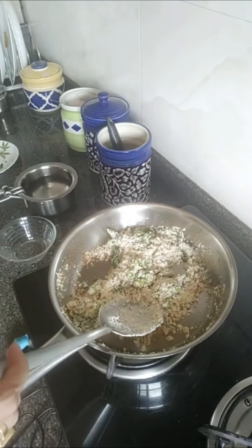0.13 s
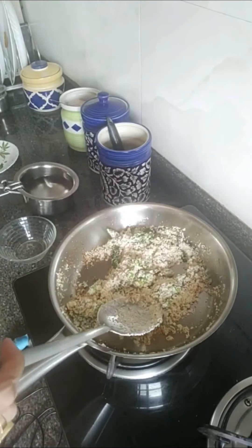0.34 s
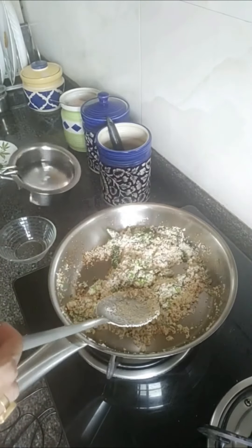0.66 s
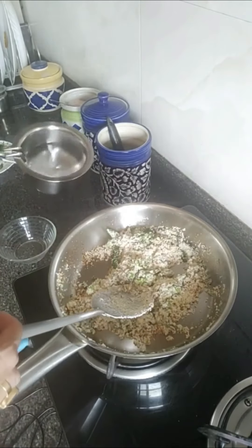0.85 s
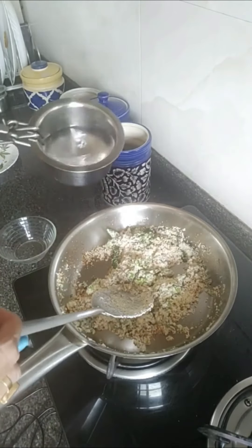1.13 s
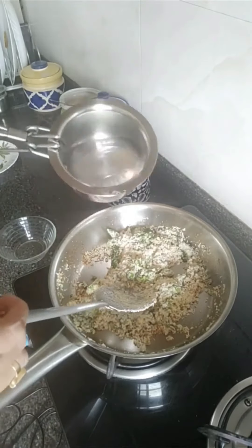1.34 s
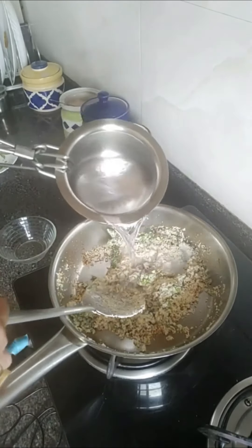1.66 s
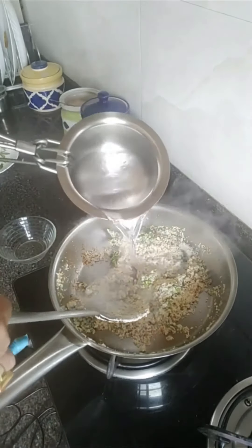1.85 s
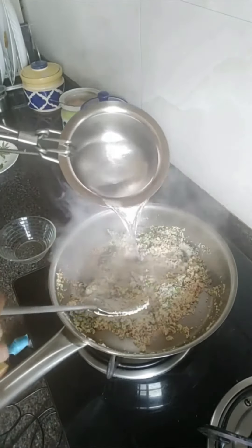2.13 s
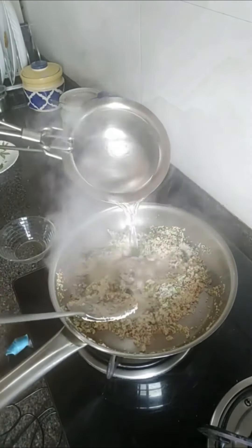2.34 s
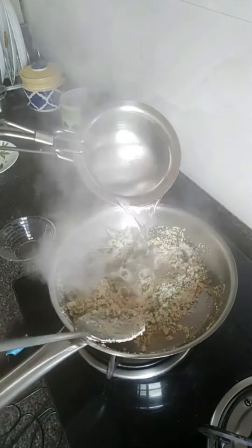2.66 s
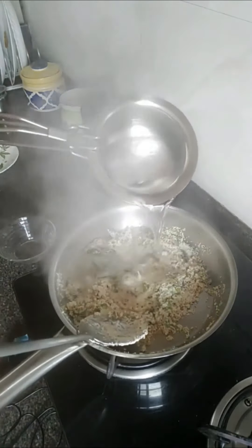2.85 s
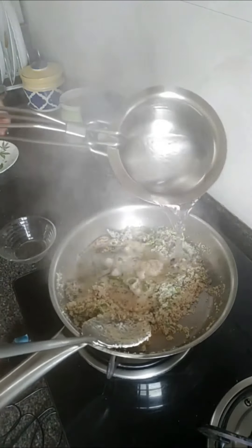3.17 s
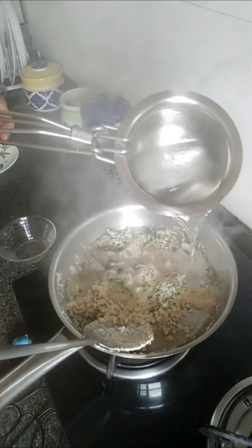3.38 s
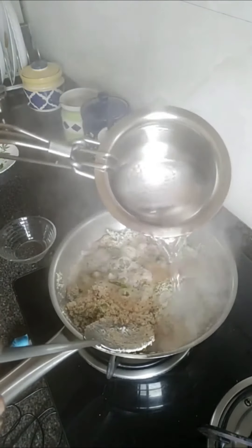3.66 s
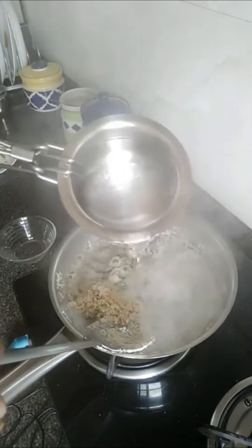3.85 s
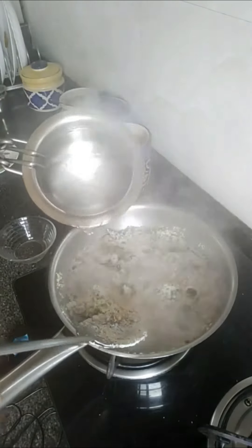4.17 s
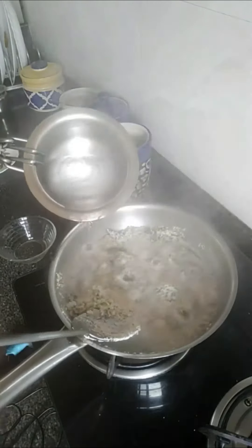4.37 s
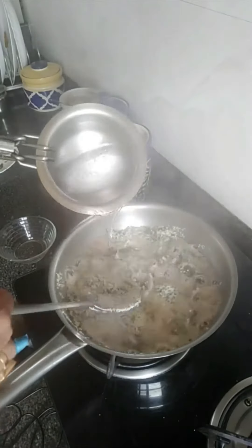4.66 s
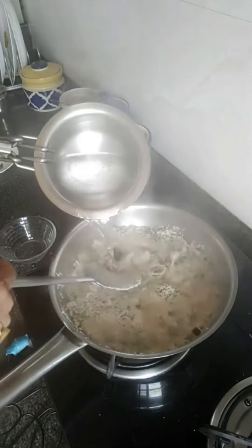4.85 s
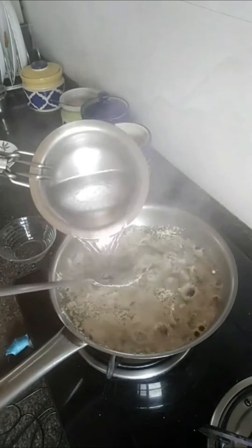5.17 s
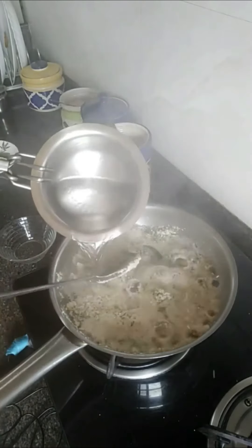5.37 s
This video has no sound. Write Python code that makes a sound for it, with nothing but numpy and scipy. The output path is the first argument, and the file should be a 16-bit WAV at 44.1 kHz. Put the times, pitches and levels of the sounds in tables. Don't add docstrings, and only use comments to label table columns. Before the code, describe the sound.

Metal utensils clink, grain crackles in a hot pan, then poured water bursts into a loud, dense steam hiss that slowly turns to bubbling sizzle.

```python
import sys
import numpy as np
from scipy import signal
from scipy.fft import rfft, irfft, next_fast_len
from scipy.io import wavfile
from scipy.ndimage import uniform_filter1d, minimum_filter1d

SR = 44100
rng = np.random.default_rng(int(sys.argv[2]) if len(sys.argv) > 2 else 0)


def persist_wave(psi):
    counts = np.round(np.clip(psi, -1, 1) * 32767).astype(np.int16)
    wavfile.write(sys.argv[1], SR, np.atleast_2d(counts).T)


def volts(x):
    e = np.asarray(x, float) / 20
    return 10 ** e


N = 242991
FREQ_HZ = np.fft.rfftfreq(next_fast_len(N), 1 / SR) + 1e-3
TIME_S = np.arange(N) / SR

# (frequency [Hz], density [dB/Hz])
BURNER = [(15, -41), (25, -14), (54, -40), (98, -4.5), (131, -11.5), (159, -4.5), (238, -6), (393, -2.5),
          (441, -5), (567, -4), (649, -8), (802, -7.5), (2500, -23.5), (3250, -61), (5500, -120)]
# (frequency [Hz], width [Hz], level [dB])
FAN = [(87.5, 12, -60.5), (111.4, 9.8, -57), (162.6, 2.3, -57), (270, 9.9, -68), (324, 11, -74)]
BURNER_DB = -44.5

# (time [s], level [dB])
DRY_FIZZ = [(.1, -46.5), (.4, -48.5), (.6, -50.5), (.65, -49.5), (.7, -49), (.8, -49), (.9, -50),
            (1.2, -50.5), (1.5, -50.5)]
# (frequency [Hz], density [dB/Hz])
DRY_COLOUR = [(1060, -3), (1800, -14), (2120, -10.5), (2720, -1), (3980, -5), (7750, -3.5), (8710, -4),
              (12500, -7), (15500, -15)]
# (time [s], peak [dB], pitch [Hz])
TICKS = [(0.1984, -45, 9470), (0.3544, -28, 2940), (0.4944, -33, 5320), (0.5104, -35, 6890),
         (0.5294, -35, 5410), (0.5786, -34, 9630), (0.7063, -33, 6650), (0.7502, -31, 8480),
         (0.7694, -30, 9480), (0.7994, -30, 8660), (0.8774, -29, 8540), (1.0834, -32, 8790),
         (1.1994, -40, 2700)]
# (start [s], end [s], pitch [Hz], level [dB])
SQUEAKS = [
    (0.38, 0.54, 5990, -51.5),
    (.41, .495, 12850, -55),
]
RUSTLE_S, RUSTLE_LENGTH_S, RUSTLE_HZ, RUSTLE_DB = 0.79, 0.07, 9500, 4.5

# (frequency [Hz], level [dB], t60 [s])
LADLE = [(1145, -29.5, 0.3), (2590, -13, 0.12), (3160, -9, 0.12), (3300, -20, .25), (3760, -15, 0.2),
         (3850, -25, 0.27), (4750, -17.5, 0.23), (5100, -21, .2), (5300, -6, 0.097), (5980, -15.5, 0.29),
         (6150, 2, 0.071), (6260, -12, 0.21), (6430, -17, 0.18), (6400, -17, 0.21), (7372, -28, 0.21),
         (7530, -17, .12), (8000, -20, 0.22), (7989, -15, 0.13), (8200, -21, 0.22), (8600, -12, 0.2),
         (8900, -17, 0.15), (9086, -9, 0.21), (9440, -22, .2), (9750, -6, 0.1), (10700, -21, .25),
         (10900, -20, .15), (11400, -20, 0.18), (11650, -18, .17), (13000, -24, .13), (14450, -25, .12)]
TONGS = [(266, -20, 0.12), (510, -9, 0.13), (713, -20.5, 0.2), (2560, -25, .12), (2944, -11, .26),
         (2956, -11, .31), (3350, -26, .2), (3564, -16, 0.16), (3690, -6.5, 0.12), (3800, -7, .1),
         (4000, -26, .25), (4480, -24, .2), (4770, -19, 0.19), (4930, -13, .17), (4910, -22, .45),
         (5000, -22, 0.39), (5200, -14, 0.18), (5370, -15, .15), (6015, -7, 0.09), (6090, -21, .35),
         (6250, -17, .35), (6600, -21, .16), (7115, -19, 0.17), (7360, -21, .17), (7640, -14, .17),
         (7370, -11, 0.12), (8100, -16, .15), (9700, -14, .13), (11200, -15, 0.12), (11700, -16, .15)]
BOWL = [(680, -3, 0.16), (1060, -1, 0.15), (1650, -2, 0.12)]
# (time [s], strength [dB], crash above strength [dB], crash t60 [s])
LADLE_BLOWS = [
    (.0005, -17.5, -3, 0.11),
    (0.021, -38, -5, 0.12),
    (0.081, -35.5, 2, 0.14),
]
TONG_BLOWS = [
    (.226, -44, 7, 0.12),
    (0.233, -27, 0.5, 0.11),
    (.245, -27, -0.5, 0.18),
    (.264, -32, -3, 0.099),
]
BOWL_BLOWS = [
    (.662, -50.5, 5, .14),
    (1.175, -52, 6, 0.15),
]
# (frequency [Hz], density [dB/Hz])
LADLE_CRASH = [(300, -18), (2000, -19), (2800, -11), (6000, -1), (10000, -7), (15500, -12)]
TONG_CRASH = [(150, -20), (550, -5), (1400, -10), (2100, -23), (3000, -4), (7000, 3.5), (12000, -11),
              (15500, -18)]
BOWL_CRASH = [(400, -6), (1100, 0), (2700, -6), (5000, -16)]

# (frequency [Hz], density [dB/Hz])
STEAM = [(330, -46), (540, -22.5), (900, -13), (1250, -13.5), (2150, -12), (2950, -4), (4700, -5),
         (6500, -1), (8000, 0), (9400, -2.5), (11500, -4), (13000, -9), (15300, -11), (15600, -12)]
# (frequency [Hz], width [Hz], level [dB])
PAN = [(460, 11, -8.5), (562.6, 10, -1), (576, 8.3, -3.5), (634, 9.4, -3.5), (696, 5.2, -6), (744, 12, -9),
       (801, 25, 3.5), (825, 20, -1), (861, 24, 0.5), (910, 20, -16), (973, 3.7, -2), (1012, 21, -3.5),
       (1062, 10, 2.5), (1104, 21, -1), (1110, 24, -14), (1197, 16, -24), (1333, 40, -10), (1483, 23, -8),
       (1528, 20, -1.5), (1670, 43, 1), (1796, 30, -3), (2140, 30, -25), (2330, 20, -5), (2466, 20, -0.5)]
# (frequency [Hz], gain [dB])
SPOT = [(300, -0.5), (2900, -1.5), (3700, 0.5), (4600, -1.5), (5500, -1), (6400, -1), (8400, 0.5),
        (9400, -2.5), (10300, 2.5), (11500, -2), (12500, -2), (13600, 2), (14600, -0.5), (15600, -4)]
# (time [s], steam hiss [dB], share of hot base under water [0-1])
FLOW = [(1.55, -15, 0.32), (1.66, -13.5, 0.22), (1.92, -12, 0.09), (2.18, -14.5, 0.47), (2.44, -14, .5),
        (2.7, -14, 0.57), (2.96, -14.5, 0.47), (3.09, -11.5, 0.33), (3.48, -14.2, 0.18), (3.87, -14, 0.36),
        (4.14, -15.5, 0.65), (4.41, -16, 0.77), (4.55, -18, 0.68), (4.68, -16.5, 0.64), (4.86, -17, 0.7),
        (5.04, -18, 0.73), (5.22, -19.5, 0.84), (5.5, -18.5, 0.67)]
# (time [s], gain [dB], length [s])
SURGES = [
    (1.584, 1.7, 0.063),
    (4.454, 1.5, 0.014),
    (5.416, 2.5, 0.022),
]
SPREAD_S = (1.9, 3.3)
FIRST_DROP_S, STREAM_S, DROPS_DB, DROPS_DB_PER_S, STREAM_DB_PER_S = 1.503, 1.549, -13, 1600, 560
FIRST_TILT = 0.11
# (bare base [dB], under water [dB])
FINE_DB, COARSE_DB, BOIL_DB = (-5.5, -7.5), (-10, -4.5), (-21.5, -13.5)
DRIFT_DB, DRIFT_PER_S = (0.77, 0.5, 0.37), 7
POOL_DB, POOL_S = -11, 0.21

ROOM_T60_S, ROOM_DB, PAN_ROOM_DB = 0.3, -9, -13.5
CEILING, TOP_HZ = 0.8, 15600
REFILL_FROM_S, REFILL_PER_S, REFILL_HZ, REFILL_WIDTH = 1.42, 6, (4600, 15000), 0.14
REFILL_REPEAT, REFILL_MORE, REFILL_OFFSET = 0.3, 0.4, 179


def unit(x):
    return x / np.sqrt(np.mean(x ** 2))


def shape(x, gain):
    return irfft(rfft(x, next_fast_len(N)) * gain, next_fast_len(N))[:N]


def colour(points):
    hz, db = np.transpose(points)
    return volts(np.interp(np.log(FREQ_HZ), np.log(hz), db, left=-90, right=-90))


def band_rms(points, lo_hz, hi_hz):
    inside = (FREQ_HZ > lo_hz) * (FREQ_HZ < hi_hz)
    return np.sqrt(np.mean(colour(points) ** 2 * inside))


def resonances(modes):
    power = 0
    for hz, width_hz, db in modes:
        power = power + volts(db) ** 2 / width_hz / (1 + (2 * (FREQ_HZ - hz) / width_hz) ** 2)
    return np.sqrt(power)


def walk(rate_hz):
    hold = int(SR / rate_hz)
    steps = np.repeat(rng.standard_normal(N // hold + 1), hold)
    return unit(uniform_filter1d(uniform_filter1d(steps, hold), hold)[:N])


def droplets(per_s, spread_db, smooth):
    size_luck, sign_luck, when = rng.random((int(4000 * N / SR), 3)).T
    size = volts(np.minimum(-spread_db * np.log(size_luck + 1e-9), 20)) * (2 * sign_luck - 1)
    used = int(min(per_s, 4000) * N / SR)
    pops = np.bincount((when[:used] * N).astype(int), size[:used], N)
    blur = rng.standard_normal(N) * smooth
    return (unit(pops) + blur) / np.hypot(1, smooth)


def sizzle(points, lowest_octave, band_db, per_s, spread_db, smooth, shared_db, own_db, quick_db):
    spectrum = 0
    sputter_db = shared_db * walk(14) + quick_db * walk(45)
    for octave in np.arange(lowest_octave, 14.1, 1 / 3):
        band = np.cos(np.pi / 2 * np.clip(3 * (np.log2(FREQ_HZ) - octave), -1, 1))
        flicker_db = sputter_db + own_db * walk(9) + quick_db * walk(60)
        burst = droplets(per_s, spread_db, smooth) * volts(flicker_db + band_db(2 ** octave))
        spectrum = spectrum + rfft(burst, next_fast_len(N)) * band
    return irfft(spectrum * colour(points), next_fast_len(N))[:N]


def stove():
    roar = unit(shape(rng.standard_normal(N), colour(BURNER))) * volts(BURNER_DB - 1.5 + 0.19 * walk(4.8))
    drone = unit(shape(rng.standard_normal(N), resonances(FAN)))
    both = roar + drone * np.sqrt(sum(volts(db) ** 2 for _, _, db in FAN))
    return both + shape(both, FREQ_HZ < 95) * np.interp(TIME_S, [0.3, 5.3], [0.3, -0.3])


def grain_fizz():
    fizz_db = np.interp(TIME_S, *np.transpose(DRY_FIZZ))
    rustle_db = RUSTLE_DB * np.exp(-((TIME_S - RUSTLE_S) / RUSTLE_LENGTH_S) ** 2)

    def band_db(hz):
        return fizz_db + rustle_db * np.exp(-np.log2(hz / RUSTLE_HZ) ** 2 / 0.3)

    fizz = sizzle(DRY_COLOUR, 32 / 3, band_db, per_s=470, spread_db=5.0, smooth=3.5,
                  shared_db=1.1, own_db=0.7, quick_db=0.74)
    return fizz / band_rms(DRY_COLOUR, 2500, 15000)


def grain_ticks():
    out, t = np.zeros(N), TIME_S[:SR // 50]
    for s, db, hz in TICKS:
        snap = rng.standard_normal(len(t)) * volts(-60 * t / 0.0069)
        snap = snap + 0.31 * np.sin(2 * np.pi * hz * t) * volts(-60 * t / 0.008)
        start = int(s * SR)
        out[start:start + len(t)] += volts(db - 5) * np.convolve(snap, [0.5, 0.34, -0.34, -0.5], "same")
    return out


def grip_squeaks():
    out = np.zeros(N)
    for start_s, end_s, hz, db in SQUEAKS:
        press = np.sin(np.pi * np.clip((TIME_S - start_s) / (end_s - start_s), 0, 1)) ** 0.8
        phase = 2 * np.pi * np.cumsum(hz * (1 + 0.0043 * walk(39))) / SR
        out += volts(db + 2.5 * walk(70)) * press * np.sin(phase)
    return out


def strike(modes, blows, crash_colour, scatter_db, rattle_db):
    out, t = np.zeros(N), TIME_S[:SR // 2]
    hz, db, t60_s = np.transpose(modes)[:, :, None]
    crash = unit(shape(rng.standard_normal(N), colour(crash_colour)))
    for s, blow_db, crash_db, crash_t60_s in blows:
        start = int(s * SR)
        level_luck, phase_luck = rng.standard_normal((2, len(modes), 1))
        rattle = np.repeat(rng.standard_normal((len(modes), 63)), 350, axis=1)
        rattle = uniform_filter1d(rattle, size=350) * np.minimum(hz / 3000, 1)
        ring_db = db + scatter_db * level_luck + rattle_db * rattle - 60 * t / t60_s
        ring = volts(ring_db) * np.sin(2 * np.pi * hz * (t + s) + 0.49 * phase_luck)
        both = ring.sum(axis=0) + crash[start:start + len(t)] * volts(crash_db - 60 * t / crash_t60_s)
        out[start:start + len(t)] += volts(blow_db) * both * np.minimum(t / 0.0011, 1)
    return out


def onset_db():
    knee_s = STREAM_S + DROPS_DB / STREAM_DB_PER_S
    drops = DROPS_DB_PER_S * np.clip(TIME_S - knee_s, FIRST_DROP_S - knee_s, 0)
    stream = STREAM_DB_PER_S * np.clip(TIME_S - STREAM_S, knee_s - STREAM_S, 0)
    return drops + stream


def steam_hiss(hiss_db, fine_db, coarse_db, boil_db, rise_db):
    fine = fine_db + 6.5 - FIRST_TILT * rise_db
    coarse = coarse_db + 7 + FIRST_TILT * rise_db
    boil = boil_db + 17.0
    pool = (boil + coarse) / 2 + POOL_DB * np.exp(-np.maximum(TIME_S - 1.53, 0) / POOL_S)
    centres = np.log([900, 1800, 3300, 7000, 13000])

    def band_db(hz):
        shares = [np.interp(np.log(hz), centres, row) for row in np.eye(5)]
        return sum(share * part for share, part in zip(shares, (boil, pool, coarse, 0, fine))) + hiss_db

    steam = sizzle(STEAM, 26 / 3, band_db, per_s=3000, spread_db=2.5, smooth=2.47,
                   shared_db=0.14, own_db=0.68, quick_db=0.68)
    steam = steam / band_rms(STEAM, 5000, 10000)
    spread = np.interp(TIME_S, SPREAD_S, [0, 1])
    return spread * steam + (1 - spread) * shape(steam, colour(SPOT))


def pan_ring():
    boiling = droplets(per_s=900, spread_db=2.5, smooth=1.56) * volts(1.34 * walk(16))
    low, high = shape(boiling, resonances(PAN[:9])), shape(boiling, resonances(PAN[9:]))
    low = low - shape(low, FREQ_HZ < 720) * np.interp(TIME_S, [1.7, 2.3], [0.7, 0])
    return unit(low + high * volts(np.interp(TIME_S, [3.45, 3.7], [-2.5, 2.5])))


def pour():
    s, flow_db, covered = np.transpose(FLOW)
    cover = np.interp(TIME_S, s, covered)
    rise_db = onset_db()
    hiss_db = np.interp(TIME_S, s, flow_db) + rise_db - 60 * (TIME_S < FIRST_DROP_S)
    for at_s, db, length_s in SURGES:
        hiss_db = hiss_db + db * np.exp(-((TIME_S - at_s) / length_s) ** 2)
    fine_db, coarse_db, boil_db = (bare + (wet - bare) * cover + drift_db * walk(DRIFT_PER_S)
                                   for (bare, wet), drift_db in zip((FINE_DB, COARSE_DB, BOIL_DB), DRIFT_DB))
    steam = steam_hiss(hiss_db, fine_db, coarse_db, boil_db, rise_db)
    return volts(0.15) * steam + pan_ring() * volts(hiss_db + boil_db - 0.7)


def scene():
    background = stove()
    clinks = strike(LADLE, LADLE_BLOWS, LADLE_CRASH, scatter_db=3.2, rattle_db=5.5)
    clinks = clinks + strike(TONGS, TONG_BLOWS, TONG_CRASH, scatter_db=-1.5, rattle_db=7.5)
    clinks = clinks + strike(BOWL, BOWL_BLOWS, BOWL_CRASH, scatter_db=0.5, rattle_db=7.0)
    pan = grain_fizz() + grain_ticks() + grip_squeaks() + pour()
    t = TIME_S[:SR // 2]
    walls = rng.standard_normal(len(t)) * volts(-60 * t / ROOM_T60_S) * (t > 0.004)
    walls = walls / np.sqrt(np.sum(walls ** 2))
    sent = volts(ROOM_DB) * clinks + volts(PAN_ROOM_DB) * pan
    mono = background + clinks + pan + signal.fftconvolve(sent, walls)[:N]
    return np.array([mono, mono])


def refill(x):
    out, hop = x.copy(), 1024
    bins, taps = np.arange(hop) + 0.5, np.arange(2 * hop) + 0.5
    window = signal.windows.kaiser_bessel_derived(2 * hop, 4 * np.pi)
    basis = window * np.cos(np.pi / hop * np.outer(bins, taps + hop / 2)) * np.sqrt(2 / hop)
    lowest_hz, highest_hz = REFILL_HZ
    bands = []
    for frame in range(int(REFILL_FROM_S * SR / hop), (N - REFILL_OFFSET) // hop - 1):
        (swap, again, _), (_, *more), place, wide = rng.random(size=(4, 3))
        start = REFILL_OFFSET + hop * frame
        if again > REFILL_REPEAT:
            bands = []
        if swap < REFILL_PER_S * hop / SR:
            hz = lowest_hz * (highest_hz / lowest_hz) ** place
            half_hz = hz * REFILL_WIDTH * (0.5 + wide) / 2
            edges_hz = zip(hz - half_hz, hz + half_hz)
            bands = [band for band, luck in zip(edges_hz, [0, *more]) if luck < REFILL_MORE]
        if not bands:
            continue
        picked = np.zeros(hop, bool)
        for lo_hz, hi_hz in bands:
            picked[int(lo_hz * 2 * hop / SR):int(hi_hz * 2 * hop / SR)] = True
        old = x[:, start:start + 2 * hop] @ basis[picked].T
        size = np.sqrt(3 * uniform_filter1d(old ** 2, size=48))
        new = rng.uniform(-1.04, 1, (2, hop))[:, picked] * size
        out[:, start:start + 2 * hop] += (new - old) @ basis[picked]
    return out


def band_limit(x):
    return signal.sosfilt(signal.butter(12, 16720, fs=SR, output="sos"), x)


def record(dry):
    need = np.minimum(CEILING / (np.abs(dry) + 1e-9), 1)
    held = dry * uniform_filter1d(minimum_filter1d(need, size=129), size=129)
    top_cut = np.clip((TOP_HZ - FREQ_HZ) / 120, 0, 1)
    mix = refill(np.array([shape(channel, top_cut) for channel in held]))
    return band_limit(mix)


dry = scene()
out = record(dry)
persist_wave(out)
```